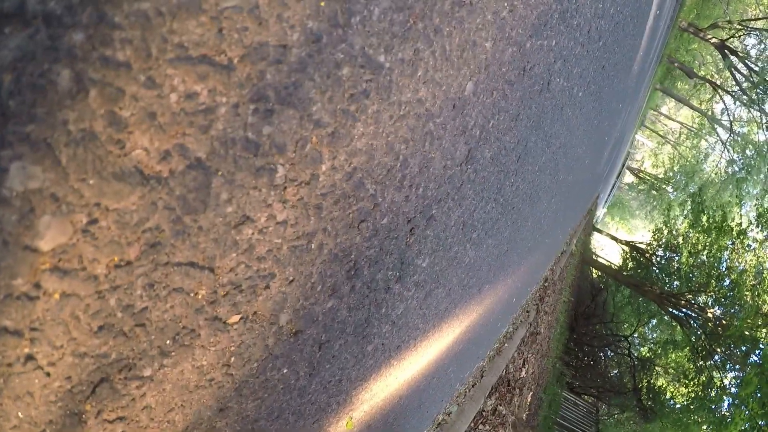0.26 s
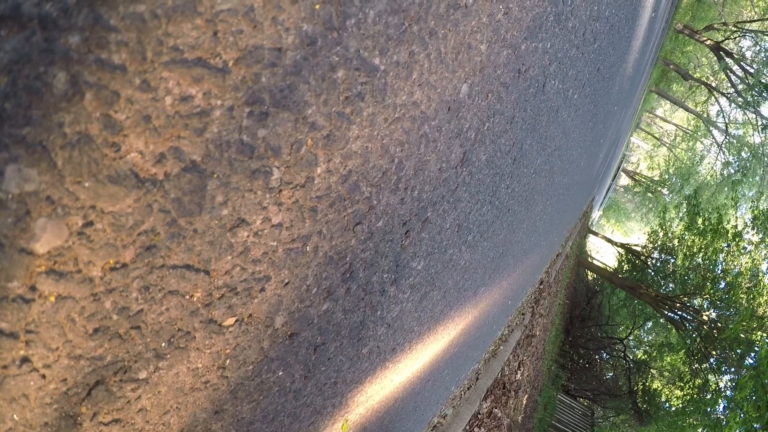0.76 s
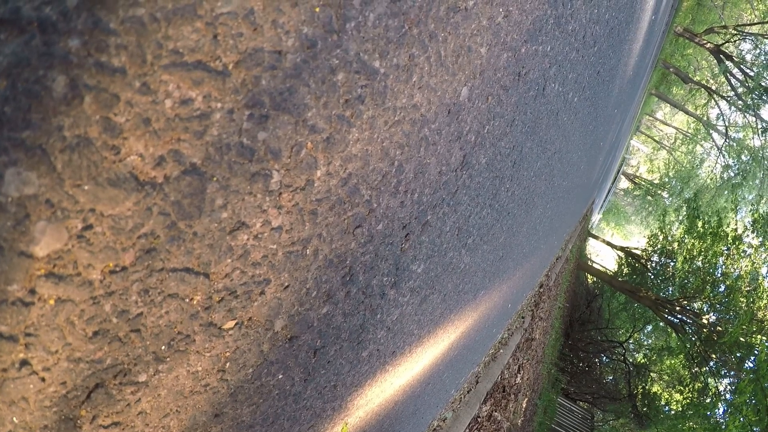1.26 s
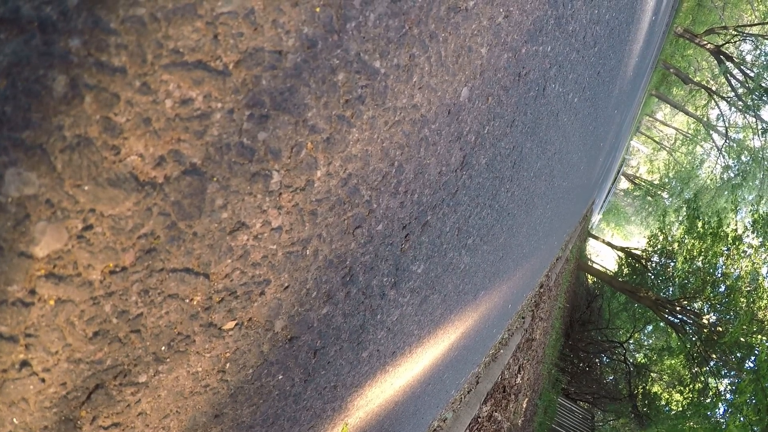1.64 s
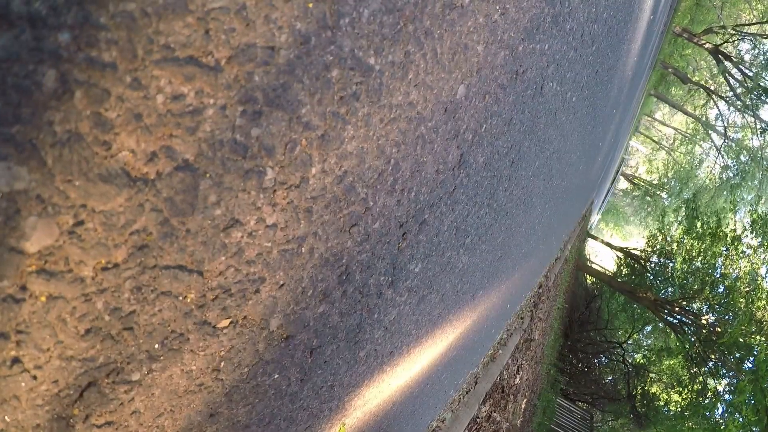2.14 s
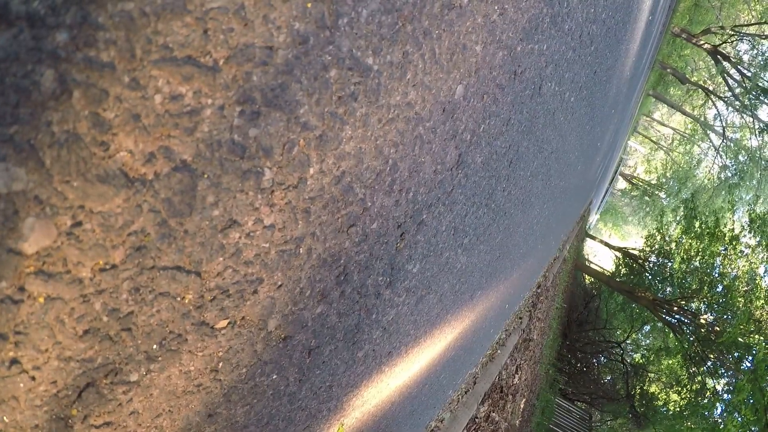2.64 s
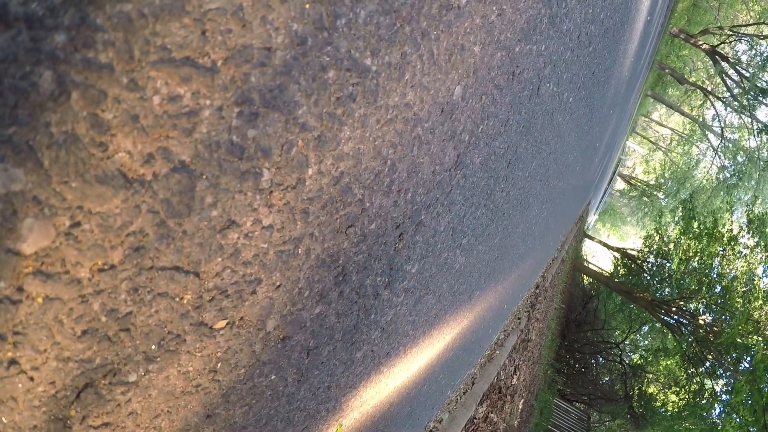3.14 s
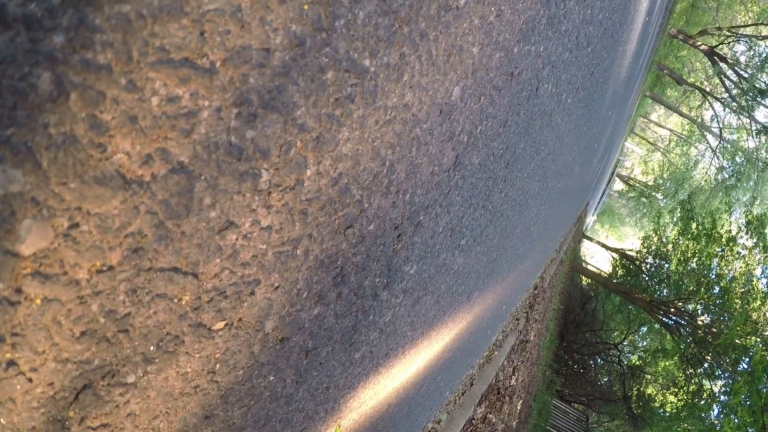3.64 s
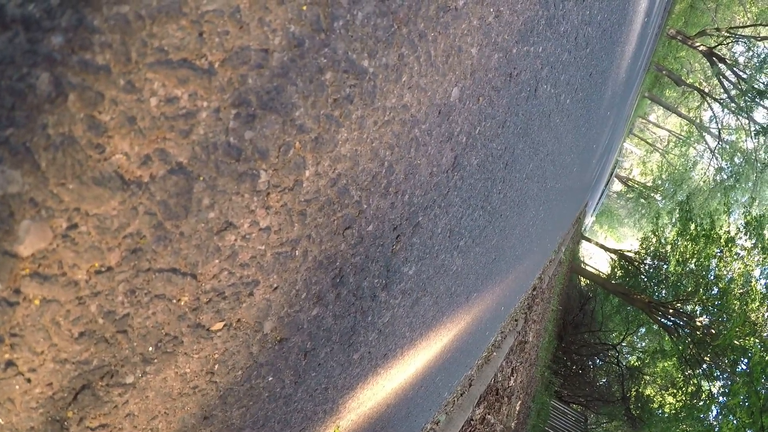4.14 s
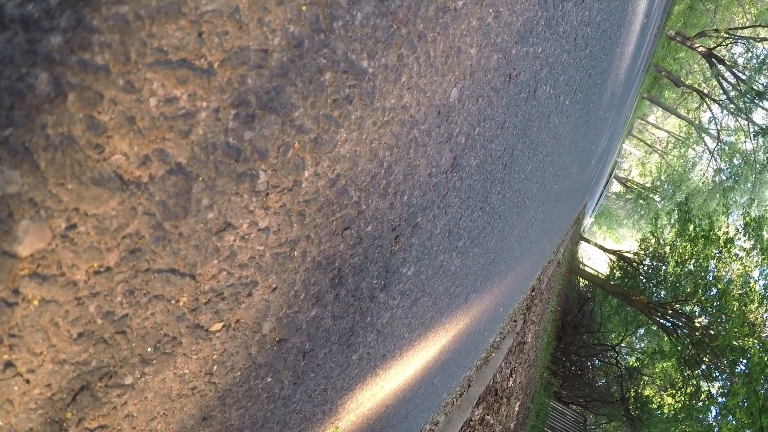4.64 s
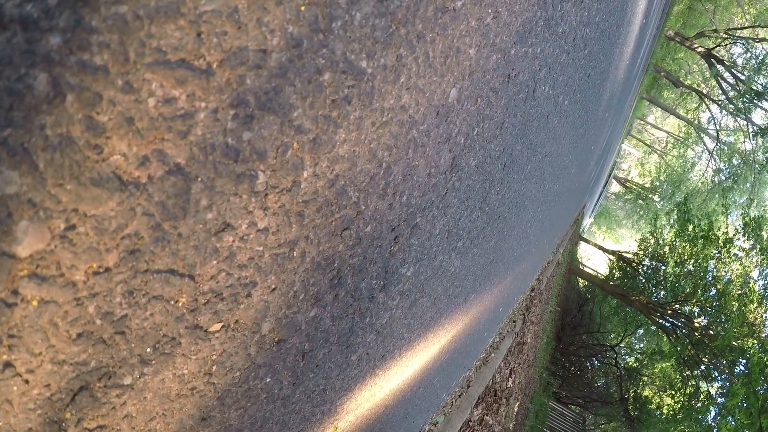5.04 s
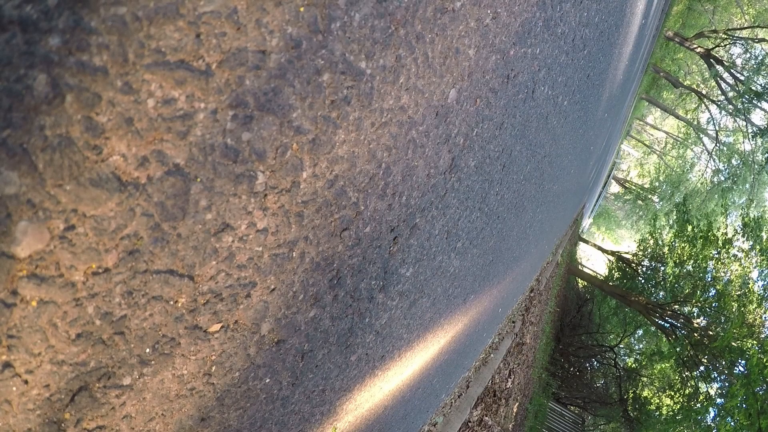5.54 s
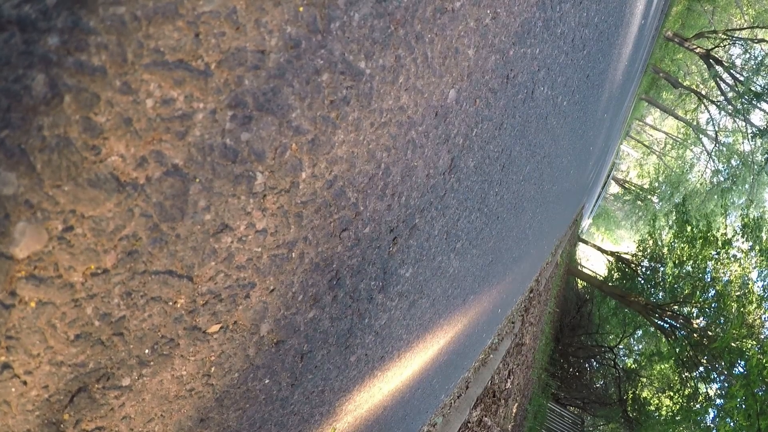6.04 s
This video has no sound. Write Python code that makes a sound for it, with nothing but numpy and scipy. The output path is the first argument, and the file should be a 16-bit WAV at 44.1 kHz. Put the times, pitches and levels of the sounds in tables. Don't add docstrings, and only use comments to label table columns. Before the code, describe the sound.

Close, low throbbing of a V-twin motorcycle lying on a road. Light scrapes of loose metal at first while the revs drop quickly to a lumpy idle. Valve and gear clatter gradually grows louder; a dull multiple knock briefly pushes it down, then it rises again. Near the end the engine sags, jolts and starts to stall. Wide stereo from two microphones fixed to the frame outdoors, with very faint hiss.

```python
import sys
import numpy as np
from scipy import signal
from scipy.fft import rfft, irfft, next_fast_len
from scipy.io import wavfile
from scipy.ndimage import uniform_filter1d

SR = 44100
rng = np.random.default_rng(int(sys.argv[2]) if len(sys.argv) > 2 else 0)


def generate_wav(sig):
    pcm = np.round(np.clip(np.atleast_2d(sig).T, -1, 1) * 32767).astype(np.int16)
    wavfile.write(sys.argv[1], SR, pcm)


def attenuation_scalar(level_db):
    decades = np.asarray(level_db, float) / 20
    return 10 ** decades


N = 277389
CLOCK = np.arange(N) / SR
FAST = next_fast_len(N + N % 2, True)
TAPS, LEAD_TAPS = 2 ** 15, 1024
STRIDE = 64
SLOW_CLOCK = CLOCK[::STRIDE]
IDLE_HZ = 16.3


def evened(x):
    return x / np.sqrt(np.mean(x ** 2) + 1e-20)


def read(points, hz):
    f, value = np.transpose(points)
    return np.interp(np.log(hz + 1), np.log(f + 1), value)


def bumps(t, events):
    return sum(db * np.exp(-((t - s) / length) ** 2) for s, length, db in events)


def body(modes, steep):
    hz = np.fft.rfftfreq(TAPS, 1 / SR)
    f, width, left_db, right_db, lead = np.transpose(modes)[:, :, None]
    shape = (1 + (2 * (hz - f) / width) ** 2) ** -steep
    log_left, log_right = (np.log((shape * attenuation_scalar(2 * db)).sum(0) + 1e-12) / 2 for db in (left_db, right_db))
    cepstrum = irfft(log_left)
    cepstrum[1:TAPS // 2] *= 2
    cepstrum[TAPS // 2 + 1:] = 0
    phase = rfft(cepstrum).imag
    turn = np.angle((shape * attenuation_scalar(left_db + right_db) * np.exp(1j * lead)).sum(0))
    left = np.exp(log_left + 1j * phase)
    right = np.exp(log_right + 1j * (phase + turn))
    return np.roll(irfft([left, right]), LEAD_TAPS, axis=1)


def ring(drive, pair):
    return signal.oaconvolve(np.atleast_2d(drive), pair[:, :TAPS // 2], axes=1)[:, LEAD_TAPS:N + LEAD_TAPS]


def noise_burst(length, db, t60):
    t = np.arange(length) / SR
    return attenuation_scalar(db - 60 * t / t60) * rng.standard_normal(length)


# (frequency [Hz], share of power [0-1])
PRIVATE_SHARE = [(100, 0.045), (400, 0.0075), (1100, 0.024), (1600, 0.082), (3000, 0.28), (6000, 0.19),
                 (10000, 0.39)]


def pair_noise():
    common, left, right = rfft(rng.standard_normal((3, N)), FAST)
    alone = np.clip(read(PRIVATE_SHARE, np.fft.rfftfreq(FAST, 1 / SR)), 0, 1)
    spectra = np.sqrt(1 - alone) * common + np.sqrt(alone) * np.array([left, right])
    return irfft(spectra, FAST)[:, :N]


# (frequency [Hz], level [dB per Hz])
ROAD_COLOUR = [(180, -35.5), (300, -1), (345, -13), (397, -9), (1200, -20.5), (1380, -13.5), (1670, -29.5),
               (5970, -37.5), (8470, -48.5), (11000, -74.5), (18600, -120)]


def road():
    colour = attenuation_scalar(read(ROAD_COLOUR, np.fft.rfftfreq(FAST, 1 / SR)))
    hiss = irfft(rfft(rng.standard_normal((2, N)), FAST) * colour, FAST)[:, :N]
    return attenuation_scalar(-72.5) * evened(hiss)


# (time [s], level [dB])
SCRAPES = [(0.004, -60), (0.0203, -54.5), (0.031, -57), (0.107, -62), (0.1141, -60), (0.1247, -60),
           (0.146, -60), (0.1697, -61), (0.195, -60), (0.245, -64), (0.2614, -62), (0.3401, -65),
           (0.361, -61), (0.3895, -72), (0.3985, -58)]
# (frequency [Hz], width [Hz], left level [dB], right level [dB], right lead [rad])
LOOSE_BITS = [(1400, 150, 5, 7.5, 0.), (2270, 300, -4, -9, 0.0059), (2920, 300, -3, -9, 0.),
              (3400, 590, -8, -13, 0.011), (5570, 540, -7, -13, 0.), (6800, 1300, -15, -19, 0.0031)]


def settling():
    scrape = np.zeros(N)
    for s, db in SCRAPES:
        scrape[round(s * SR):][:1000] += noise_burst(1000, db, t60=0.046)
    return attenuation_scalar(9.0) * ring(scrape, body(LOOSE_BITS, steep=1.1))


# (time [s], frequency [Hz], left level [dB], t60 [s], right minus left [dB])
PINGS = [(.002, 98.2, -26, .3, -1.5), (.024, 2920, -69, .2, -5), (.028, 5560, -63, .04, -7),
         (.012, 2300, -67, .12, -5), (.108, 2270, -71, 0.48, -4), (.118, 3000, -66, .05, -3),
         (.16, 87, -46, .5, -4), (.196, 5650, -73, .04, -6), (.262, 3230, -69, .04, -3),
         (0.331, 70.6, -50, .6, 1), (1.708, 412, -29, 0.065, -9), (1.72, 280, -24, 0.12, -7),
         (1.738, 127, -29, 0.14, -1), (1.757, 85, -32, 0.27, 2), (5.864, 263, -23.5, .16, -7),
         (5.89, 98, -31, 0.18, 0), (5.95, 270, -26.5, .2, -8.5), (6.01, 144.5, -29, 0.22, 7),
         (6.07, 267.7, -33, 0.36, -7), (6.16, 262, -27, 0.2, -8), (6.196, 146, -32, 0.33, 5),
         (6.258, 144, -30.5, .5, 5.5), (6.24, 269, -30, 0.22, -7)]


def pings():
    out, t = np.zeros((2, N + SR)), np.arange(SR // 2) / SR
    for s, hz, db, t60, right_db in PINGS:
        build_up = 1 - np.exp(-t * hz / 1.5)
        tone = attenuation_scalar(db - 60 * t / t60) * build_up * np.sin(2 * np.pi * hz * t)
        out[:, round(s * SR):][:, :len(t)] += tone * attenuation_scalar(np.array([[0], [right_db]]))
    return out[:, :N]


# (time [s], thud level [dB], crack level [dB], length of the push [s])
JOLTS = [(1.707, -14, -35.5, 0.00065), (1.723, -14, -37, 0.00067), (1.731, -12.5, -46, 0.00097),
         (1.752, -15, -62, 0.0029), (1.99, -23, -64, .004), (2.11, -27, -66, .004),
         (3.569, -21, -60, 0.0026), (5.74, -27, -66, .003), (5.87, -21, -49, 0.00092),
         (5.96, -20.5, -51, 0.0007), (6.03, -22, -57, .003), (6.176, -22, -40, 0.00059)]
# (frequency [Hz], width [Hz], left level [dB], right level [dB], right lead [rad])
ROCKING = [(26.1, 4.1, 0.5, -4.5, -2.5), (67.9, 8.8, 5.5, 5.5, -2), (100, 13, -0.5, -9.5, -2),
           (170, 47, -10.5, -2, 1.), (258, 56, -5.5, -13.5, 1), (395, 48, -18, -16.5, 2)]


def jolts():
    push, crack, t = np.zeros(N + 2000), np.zeros(N + 2000), np.arange(1500) / SR
    for s, thud_db, crack_db, length in JOLTS:
        at = slice(round(s * SR), round(s * SR) + len(t))
        push[at] += attenuation_scalar(thud_db) * t / length * np.exp(-t / length)
        crack[at] += noise_burst(len(t), crack_db, t60=0.019)
    shell = body([m for m in CASING + HOUSING if m[0] < 3000], steep=0.97)
    thuds = attenuation_scalar(11.5) * ring(push[:N], body(ROCKING, steep=0.93))
    return thuds + attenuation_scalar(33.0) * ring(crack[:N], shell)


# (time [s], level [dB])
LAST_TICK = (6.176, -40.5)
# (frequency [Hz], width [Hz], left level [dB], right level [dB], right lead [rad])
COVER = [(1000, 99, 5, 6, 0.), (1480, 150, 3, 2.5, 0.)]


def last_tick():
    s, db = LAST_TICK
    tap = np.zeros(N)
    tap[round(s * SR):][:600] = noise_burst(600, db, t60=.04)
    return attenuation_scalar(10.5) * ring(tap, body(COVER, steep=1.9))


# (time [s], level [dB])
HARD_BLOWS = [(0.454, -52), (0.566, -48.5), (1.078, -48), (1.705, -37), (1.933, -46), (2.115, -46),
              (2.602, -48), (2.723, -41), (2.908, -41), (3.093, -36), (3.589, -41), (4.03, -38),
              (4.296, -35), (4.396, -40), (5.002, -34.5), (5.125, -39), (5.307, -38.5), (5.552, -39.5),
              (6.116, -45)]
# (frequency [Hz], width [Hz], left level [dB], right level [dB], right lead [rad])
KNOCK = [(690, 240, -1, 1, 0.0042), (905, 220, 0, 0, 0.0047), (1400, 230, -3, -7, 0.),
         (2200, 600, -29, -30.5, 0.0036)]


def hard_blows():
    tap = np.zeros(N)
    for s, db in HARD_BLOWS:
        knock = noise_burst(600, -5, t60=.014)
        knock[0] += attenuation_scalar(15)
        tap[round(s * SR):][:600] += attenuation_scalar(db) * knock
    return attenuation_scalar(12.5) * ring(tap, body(KNOCK, steep=1.27))


# (time [s], length [s], level [dB])
CASE_SWELLS = [(0.151, .05, 3.5), (.35, 0.041, 3), (0.698, .12, 2.5), (1.3, .1, 0.5), (1.847, .05, 3.5),
               (2.172, .1, 4.5), (2.451, 0.049, -4), (2.753, .06, 3), (3.201, 0.25, 2), (3.552, .06, 3.5),
               (4.454, .06, -6), (4.755, 0.046, 3.5), (4.85, .05, -2.5), (5.049, 0.051, -4.5),
               (5.761, .06, 6), (5.976, .05, 4.5), (6.049, 0.043, -2)]


def case_swell():
    return attenuation_scalar(np.interp(CLOCK, SLOW_CLOCK, bumps(SLOW_CLOCK, CASE_SWELLS)))


def strikes(cycle, place, db, spread_db, jitter):
    turns = np.arange(np.ceil(cycle[0] - place), cycle[-1] - place)
    chance = rng.standard_normal((140, 2))[:len(turns)]
    at = np.interp(turns + place + jitter * chance[:, 0], cycle, np.arange(N)).astype(int)
    return np.bincount(at, attenuation_scalar(db + spread_db * chance[:, 1]), N)


# (place in the cycle [0-1], level into the case [dB], covers [dB], pipes [dB], housing [dB])
BLOWS = [(0.038, -7, -6, -11.5, -3), (0.118, 0.5, 0, 0.5, -7.5), (0.171, -5, 6, -5.5, 3),
         (0.332, -2, 0, -0.5, 0.5), (.47, -0.5, -5.5, -10.5, 1.5), (.58, -5, -7, 4, -1.5),
         (.68, 9.5, -5.5, 5, -5.5), (.77, -2.5, -0.5, -6.5, 7.5), (.88, 1, -13, -4.5, 0)]
BLOW_T60 = (0.054, 0.023, 0.016, 0.014)
CHURN_DB = (-10, -0.5, -4, 1)
PARTS_HZ = (0, 520, 1150, 3000, 20000)
# (frequency [Hz], width [Hz], left level [dB], right level [dB], right lead [rad])
CASING = [(405.7, 17.3, -10, -4.5, -2.5), (472, 36, -26, -20.5, -2), (548, 70, -20.5, -24, -4),
          (663, 73, -14, -14, -2.5), (731, 54, -16.5, -18.5, -2.5), (790, 77, -15.5, -15.5, -3),
          (880, 58, -13.5, -14.5, -3.0), (956, 50, -13, -14, -3.5), (1046, 87, -14.5, -17, -2.5),
          (1252, 57, -26, -26.5, -2.5), (1347.5, 71, -20.5, -32, -1.57), (1444, 48, -23.5, -41, -1.7),
          (1743, 60, -40, -36.5, -2), (1814, 98, -35.5, -41.5, -4.3)]
# (frequency [Hz], width [Hz], left level [dB], right level [dB],
# right lead [rad])
HOUSING = [(2007, 81, -33, -37, -3.5), (2300, 130, -40.5, -41, -1.55), (2590, 260, -52.5, -55, -0.2),
           (3228, 49, -40, -52, -0.5), (3410, 480, -47.5, -54, -5), (4022, 62, -39.5, -40.5, -0.1),
           (4680, 1200, -51, -53.5, 0.5), (5010, 260, -47, -46.5, -2), (5600, 180, -41.5, -40.5, -2.2),
           (5926, 110, -38.5, -38, -1.5), (6255, 450, -40.5, -40.5, -2.5), (6880, 290, -41, -41, -3.5),
           (7180, 180, -44, -42, -4), (7790, 250, -47.5, -50, -4)]
# (frequency [Hz], width [Hz], left level [dB], right level [dB], right lead [rad])
GRILLE = [(8470, 500, -58, -49, 2.5), (9400, 670, -60.5, -56, -2.5), (10000, 800, -62.5, -62.5, -1),
          (11000, 220, -66, -64, -1.5), (11600, 400, -73, -72, -3.5), (12500, 200, -73.5, -77.5, 0),
          (13800, 900, -81, -82, 1), (15050, 150, -80, -79, -3.)]


def clatter(cycle, tick_db):
    out, t = np.zeros((2, N)), np.arange(3000) / SR
    for part, (t60, churn_db) in enumerate(zip(BLOW_T60, CHURN_DB)):
        train = sum(strikes(cycle, row[0], row[1 + part], spread_db=0.1, jitter=0.0074) for row in BLOWS)
        decay = attenuation_scalar(-60 * t / t60) * (1 - np.exp(-t / 0.00043))
        rattle = signal.oaconvolve(train, decay)[:N] + attenuation_scalar(churn_db)
        modes = [m for m in CASING + HOUSING + GRILLE if PARTS_HZ[part] < m[0] < PARTS_HZ[part + 1]]
        sound = ring(evened(rattle * pair_noise()), body(modes, steep=1.233))
        if part == 0:
            sound = sound * case_swell()
        if part == 3:
            sound = sound * attenuation_scalar(np.minimum(tick_db, 2.5))
        out += sound
    return out / np.sqrt(np.mean(out ** 2))


# (time [s], length [s], loss [dB])
STUMBLES = [(1.815, 0.081, 10), (2.216, 0.035, 4.5), (2.763, 0.038, 9.5), (3.578, 0.053, 12),
            (4.311, 0.054, 5.5), (4.537, 0.043, 5.5), (5.006, 0.026, 5)]


def stumbles(t):
    return bumps(t, STUMBLES)


# (time [s], length [s], frequency [Hz], level
# [dB])
SHIFTS = [(0.043, 0.11, 90, -17), (.04, .06, 70, -4), (0.093, .03, 90, -7), (0.17, .05, 84, 1.5),
          (.26, 0.042, 144, 15), (.3, .03, 76, -1), (.02, 0.065, 275, -5), (0.58, .04, 33, -3),
          (.47, .04, 265, 0.5), (.58, .07, 65, -7), (0.51, .05, 272, 4), (1.05, 0.027, 146, -10),
          (1.14, 0.043, 146, -4.5), (1.41, 0.096, 146, 4), (1.9, 0.022, 150, 5), (1.9, 0.054, 250, -12),
          (1.95, .03, 66, -4), (2.2, 0.11, 146, 3.5), (2.644, 0.12, 146, 4.5), (2.78, 0.065, 260, 8.5),
          (2.92, 0.065, 65, -9), (5.66, 0.2, 170, -10), (3.5, .04, 60, -7), (3.58, .05, 200, 3),
          (3.62, .06, 65, 4.5), (4.0, 0.036, 250, -1), (4.38, 0.051, 250, -6), (4.45, 0.048, 290, 5.5),
          (4.68, 0.071, 264, 7.5), (4.96, 0.07, 65, -5), (6.08, 0.18, 114, -11), (5.02, 0.035, 290, -10),
          (5.48, .05, 250, 5), (5.55, .03, 146, -7), (5.8, 0.046, 143, 1), (1.7, 0.13, 255, -5),
          (5.65, .12, 200, -0.5), (5.88, 0.034, 270, -4), (5.87, .04, 148, 0), (5.9, .03, 95, 8),
          (5.97, .04, 272, -1), (5.99, .1, 26, 4.5), (5.98, .05, 138, 9), (6.09, 0.053, 130, 5.5),
          (6.07, 0.2, 51, -9), (6.06, .04, 65, 7), (6.03, .03, 255, -8), (6.12, .03, 255, -3),
          (6.22, .05, 142, 7), (6.22, .03, 255, -4)]


def shifts(steps, hz):
    s, length, centre_hz, db = np.transpose(SHIFTS)[:, :, None]
    span = .11
    return (db * np.exp(-((steps - s) / length) ** 2 - ((hz / centre_hz - 1) / span) ** 2)).sum(0)


FIRINGS = (.41, .855)
ORDERS_DB = [-28.5, -5, -22, 1, -2, -5.5, -9, -20, -1.53, -18, -23.5, -11, -27.5, -15.5, -11, -9.5, -14.5,
             -24.5, -22, -28, -31, -33.5]
# (frequency [Hz], width [Hz], left level [dB], right level [dB], right lead [rad])
FRAME = [(25.7, 7.4, -6.5, -7, -2), (36.4, 15, -15, -21.5, -3), (49.6, 15, -11.5, -8, -2),
         (69.4, 13, -2, -1, -3), (85, 13.4, -2, -3, 2.5), (102.7, 14, -2, -12.5, -1.75),
         (114.8, 8.6, -10.5, -18, 0.45), (133.9, 19, -8.5, 0, 0.), (144.75, 10.8, -1, 7, 1),
         (167.5, 25, -9, -14.5, 0.84), (192.5, 19, -8.5, -12.5, 4.32), (240.8, 17, 1, -6.5, 1.2),
         (264.8, 19.6, 3, -5, 1.), (299, 35, -10.5, -9.5, 2.5)]


def firings(cycle, low_db, high_db):
    overrun_db_per_hz, rough_db_per_hz = 0.96, 0.75
    main_order, stumble_spill, split_hz = 9, .25, 125
    frame = body(FRAME, steep=1.207)
    at_idle = abs(rfft(frame[0]))
    waver = evened(uniform_filter1d(rng.standard_normal((400, len(ORDERS_DB), 2)), size=3, axis=0))
    steps, speed = np.linspace(0, N / SR, 400), np.gradient(cycle) * SR

    rough_db = rough_db_per_hz * np.maximum(IDLE_HZ - speed, 0)
    rumble = attenuation_scalar(14 + rough_db + (low_db + high_db) / 2) * pair_noise()

    speed, low_db, high_db = speed[::STRIDE], low_db[::STRIDE], high_db[::STRIDE]
    off_db = overrun_db_per_hz * abs(speed - IDLE_HZ)
    overrun_db = overrun_db_per_hz * np.maximum(speed - IDLE_HZ, 0)
    loss_db, tones = stumbles(SLOW_CLOCK), np.zeros(N)
    for order, db in enumerate(ORDERS_DB, start=1):
        timing = np.angle(sum(np.exp(-2j * np.pi * order * place) for place in FIRINGS))
        swell, slip = (np.interp(SLOW_CLOCK, steps, column) for column in waver[:, order - 1].T)
        high = np.clip((order * speed - split_hz) / 20 + .5, 0, 1)
        if order == main_order:
            uneven_db = 1.1 * swell - loss_db
        else:
            uneven_db = 2.56 * min(order / 5.2, 1) * swell + loss_db * stumble_spill * (order > 2)
        speed_db = off_db if order < 5 else -overrun_db
        load_db = shifts(SLOW_CLOCK, order * speed) + speed_db + low_db + high * (high_db - low_db)
        size = attenuation_scalar(db + uneven_db + load_db) / at_idle[round(order * IDLE_HZ * TAPS / SR)]
        phase = np.interp(CLOCK, SLOW_CLOCK, timing + .025 * order * slip)
        tones += np.interp(CLOCK, SLOW_CLOCK, size) * np.cos(2 * np.pi * order * cycle + phase)
    return ring((rumble - tones) * np.minimum(CLOCK / 0.007, 1), frame)


# (time [s], four-stroke cycles a second [Hz])
SPEED = [(0.0, 24.48), (0.41, 16.33), (0.62, 15.9), (0.9, 16.12), (1.7, 16.45), (2.75, 16.51),
         (3.05, 16.02), (3.35, 16.33), (3.6, 15.57), (3.72, 16.02), (4.5, 16.43), (5.3, 16.46),
         (5.75, 16.07), (5.84, 15.7), (5.93, 13.05), (6.02, 12.62), (6.15, 12.87)]
# (time [s], level [dB])
GAIN = [(0.0, -62.5), (0.08, -66.5), (0.35, -66.5), (0.8, -60), (1.15, -55.5), (1.69, -52), (1.75, -57.5),
        (2.15, -58), (2.5, -53.5), (2.9, -51.5), (3.4, -50), (5.0, -48.5), (5.65, -49), (5.92, -53),
        (6.2, -57), (6.29, -63)]


def scene():
    speed = np.interp(CLOCK, *np.transpose(SPEED))
    cycle = np.cumsum(speed) / SR
    clatter_db = np.interp(CLOCK, *np.transpose(GAIN))

    lag_s = .25
    smooth_speed = uniform_filter1d(speed, round(lag_s * SR))
    sag = np.minimum(np.interp(CLOCK - lag_s / 2, CLOCK, smooth_speed) - IDLE_HZ, 0)
    tick_db = 1.5 * sag

    drop_db = -49 - clatter_db
    low_db = -0.08 + 0.65 * drop_db
    high_db = 0.95 + 0.38 * np.minimum(drop_db, 9)

    engine = attenuation_scalar(18.5) * firings(cycle, low_db, high_db) + attenuation_scalar(13) * clatter(cycle, tick_db)
    loose_parts = settling() + pings() + last_tick() + hard_blows()
    return road() + loose_parts + jolts() + attenuation_scalar(clatter_db) * engine


def band_limit(x):
    return signal.sosfilt(signal.butter(12, 15700, fs=SR, output="sos"), x)


def record(dry):
    faded = dry * np.minimum(CLOCK / 0.0016, 1)
    cut = signal.sosfilt(signal.butter(2, 16, "high", fs=SR, output="sos"), faded)
    cut = signal.sosfilt(signal.butter(2, 9500, fs=SR, output="sos"), cut)
    return band_limit(cut)


dry = scene()
out = record(dry)
generate_wav(out)
```